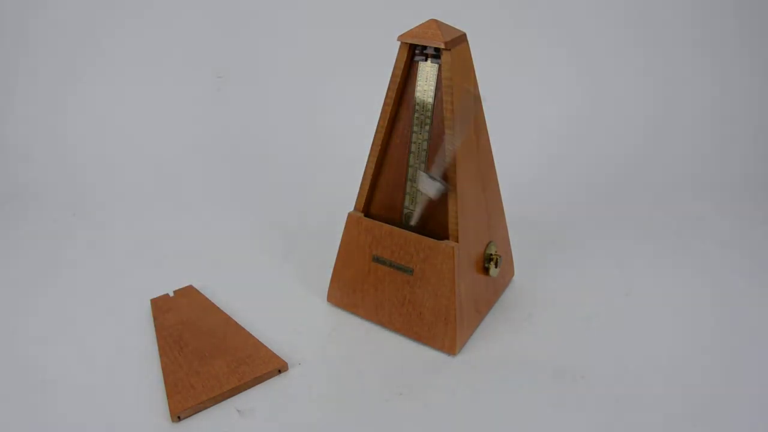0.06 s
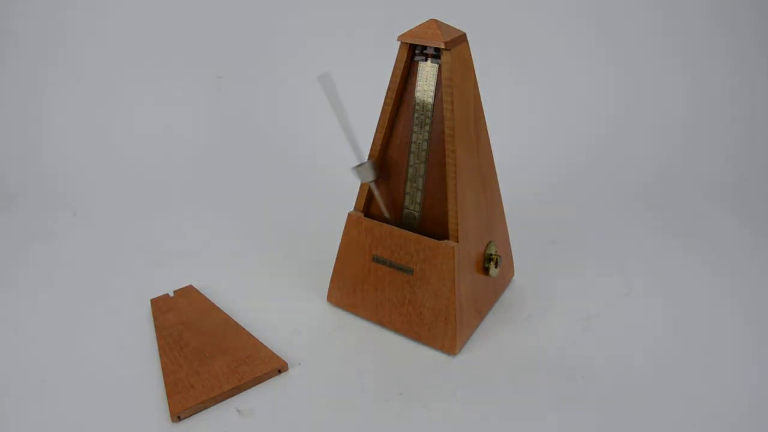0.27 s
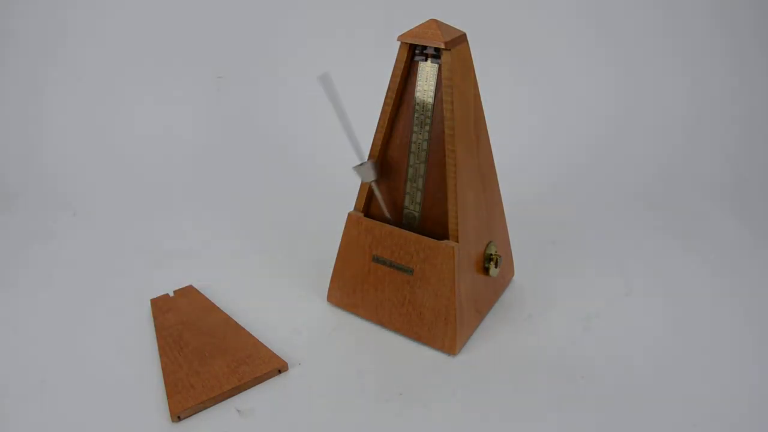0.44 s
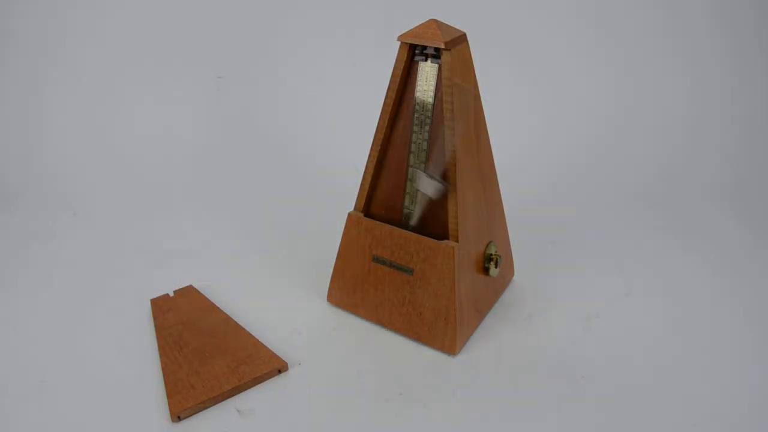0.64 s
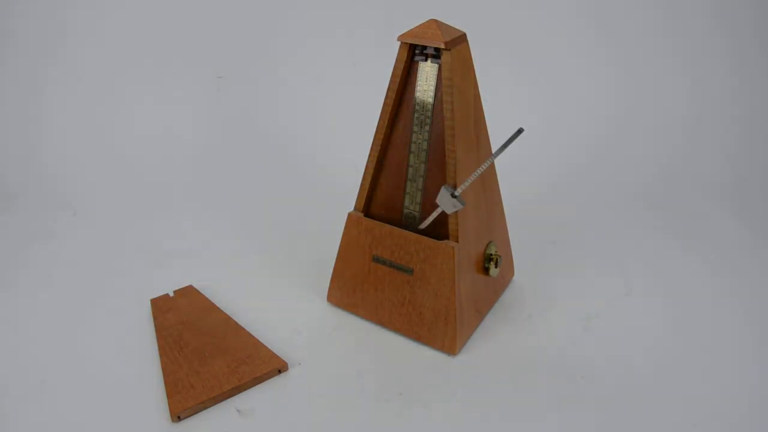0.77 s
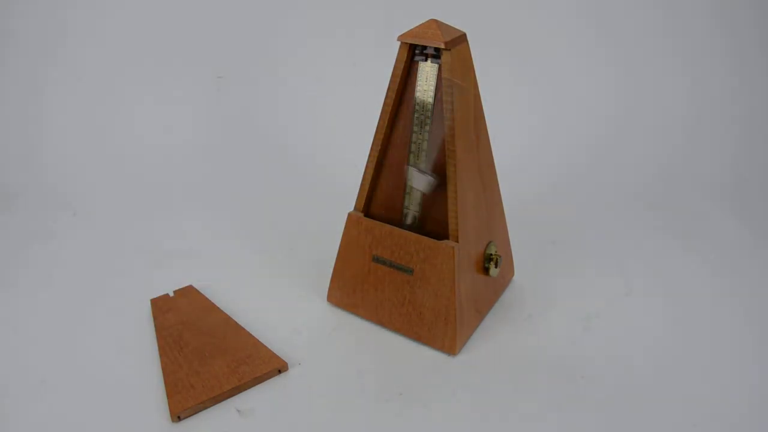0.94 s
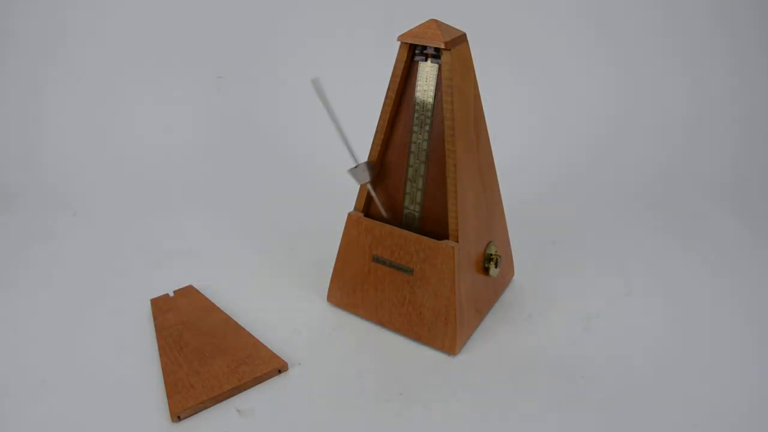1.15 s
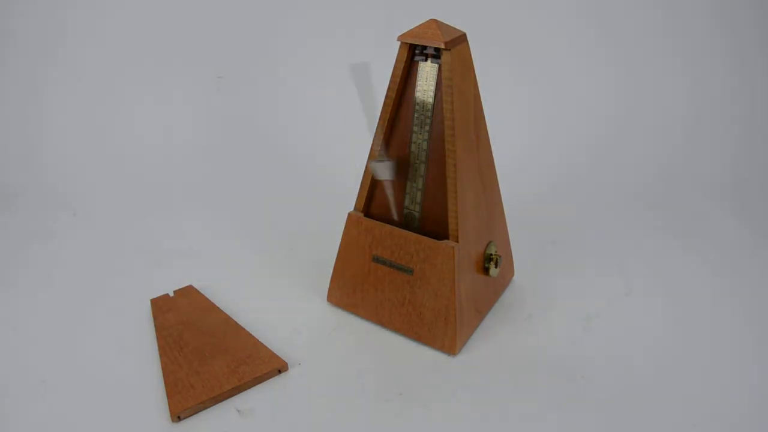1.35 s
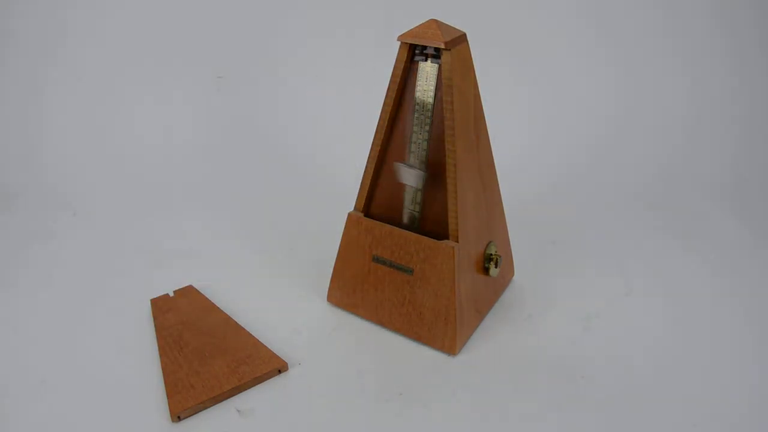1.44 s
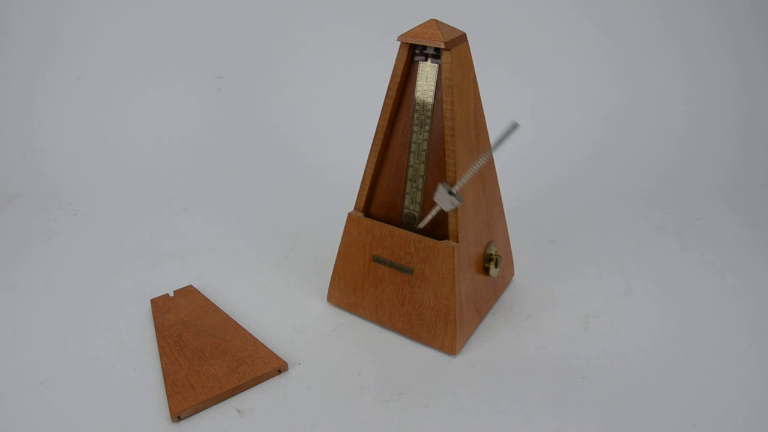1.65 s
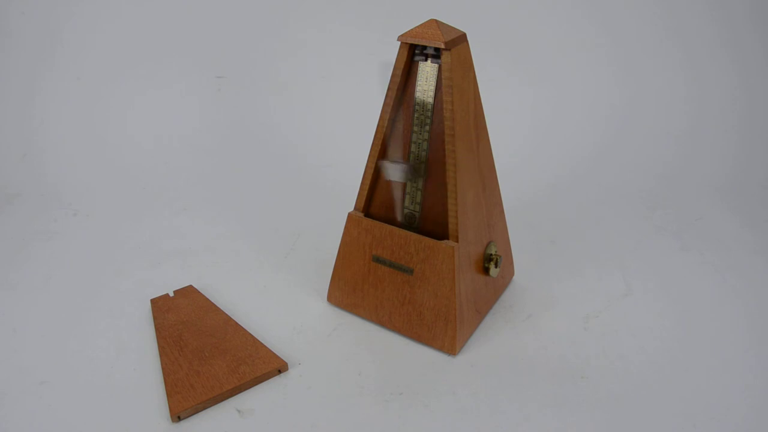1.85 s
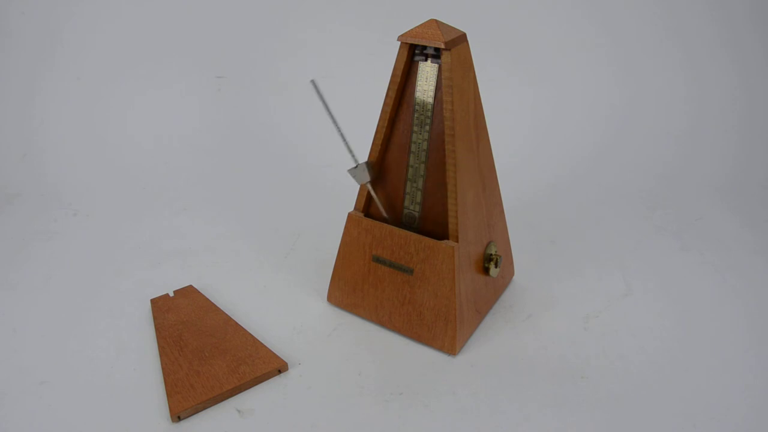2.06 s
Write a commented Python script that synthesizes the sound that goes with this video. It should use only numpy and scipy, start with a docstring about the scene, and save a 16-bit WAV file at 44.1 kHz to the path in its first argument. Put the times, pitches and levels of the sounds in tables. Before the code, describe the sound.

Sharp, hollow wooden metronome ticks, slightly uneven, five beats in two seconds over faint room hiss

```python
"""A low mains hum, soft room air and faint high whines are heard first, as steady sines and coloured noise.
Then a clockwork metronome ticks, slightly lopsided and close: before each beat the escapement squeaks
(a wavering sine) and slips with a tiny click (a decaying noise burst). The beat strikes, and the hollow wooden
case and steel works ring as damped modes with a noisy rattle. A near surface echoes the ticks, the room
answers with a diffuse noise tail, and the loudest peaks overload."""
import sys
import numpy as np
from scipy import signal
from scipy.fft import rfft, irfft
from scipy.io import wavfile
from scipy.ndimage import uniform_filter1d

SR = 44100
rng = np.random.default_rng(int(sys.argv[2]) if len(sys.argv) > 2 else 0)


def output_pcm(signal):
    """Save a mono or channel-first signal as 16-bit PCM at the path in sys.argv[1].

    Samples are clipped to [-1, 1] before scaling.
    """
    pcm = np.clip(np.atleast_2d(signal).T, -1, 1) * 32767
    wavfile.write(sys.argv[1], SR, np.round(pcm).astype(np.int16))


N = 92610  # length [samples]

# Levels are relative and apply ahead of record().
# colour of the room air: (frequency [Hz], spectral level [dB])
AIR_COLOUR = [(25, -22.5), (60, -13), (160, -8), (230, -2.5), (320, 2), (500, -6.5), (680, -1), (1200, -5),
              (2700, -9.5), (4800, -14), (5700, -24.5), (6600, -21.5), (8000, -29.5), (11000, -34.5),
              (14000, -41.5)]
AIR_RMS_DB = -54
# mains hum and two thin whines: (frequency [Hz], peak level [dB])
STEADY_TONES = [(119.6, -66), (8861, -76.5), (15682, -83)]

# squeaks of the escapement: (time of the loudest point [s], peak level [dB])
SQUEAK_SWELLS = [(.140, -58.5), (0.574, -71), (.980, -66), (1.415, -71), (1.820, -61)]
SQUEAK_HZ, SQUEAK_WAVER_RMS_HZ = 8866, 12
SQUEAK_WIDTH_S = 0.02  # from the peak to 1/e of it

# slips of the escapement before the beats: (time [s], strength [dB])
ESCAPEMENT_SLIPS = [(.1410, -47.5), (.5895, -45), (.9840, -42), (1.4340, -38), (1.8323, -46)]
# colour of the dull slip click: (frequency [Hz], spectral level [dB])
SLIP_COLOUR = [(200, 1), (700, 33), (1900, 18.5), (2600, 31.5), (3400, 29), (4600, 17.5), (5700, 5),
               (7000, 13), (11000, 2), (14000, -10)]
SLIP_T60_S = 0.029

# beats of the metronome: (time [s], strength [dB], side of the swing [0 or 1])
METRONOME_BEATS = [(0.2034, 1.5, 0), (0.6392, 0.5, 1), (1.0459, 1.48, 0), (1.482, 0.74, 1), (1.8892, 2, 0)]
# modes of the wooden case: (frequency [Hz], level [dB], t60 [s])
CASE_MODES = [(667.1, -4.5, .03), (716.3, -4, 0.022), (921, -25, .04), (1139, -22, 0.046),
              (1505, -35.5, 0.28), (1671, -17, 0.017), (1836, -17.5, .028), (2450, -17.5, .02),
              (2586, -12.5, 0.032), (3073, -11, .028), (3343, 0, 0.0099)]
# modes of the steel works: (frequency [Hz], level [dB], t60 [s])
WORKS_MODES = [(3800, -16.5, 0.027), (4022, -22.5, 0.057), (4530, -13, 0.027), (4660, -37, .03),
               (4993, -15.5, .032), (5230, -17, 0.02), (6470, -14.5, .016), (6655, -21, 0.034),
               (7190, -18, .018), (8690, -30, .018), (9550, -28, .014), (11110, -14.5, 0.0053),
               (14400, -7.5, 0.0014)]
# standard deviations of mode level: from blow to blow, and of the lean added on one side, taken off the other
BLOW_SPREAD_DB, SIDE_LEAN_DB = 1.72, 0.28
# colour of the rattle of dense small modes: (frequency [Hz], spectral level [dB])
RATTLE_COLOUR = [(100, -24), (450, -16.5), (800, 3.5), (1350, 12), (2050, 10), (2800, 18), (3300, 16.5),
                 (4200, 16.5), (5200, 18.5), (5650, -2), (6400, 12), (8200, 7.5), (9300, 9), (11300, 0.5),
                 (12100, -13), (14200, -9), (16000, -25)]
RATTLE_T60_S = 0.035
RATTLE_CHANGE = 0.47  # share of the power that differs from blow to blow
CASE_LOW_CUT_HZ = 523  # so small a case radiates no bass
ECHO_S, ECHO_DB = 0.0068, -24.5  # one reflection from a near surface

# the room's answer to the crack a beat throws out on all sides: (frequency [Hz], spectral level [dB])
CRACK_ANSWER = [(100, -27.5), (430, -8.5), (540, 7), (660, 17.5), (760, 19.5), (850, 7.5), (1150, 8),
                (1330, 5.5), (1800, 12.5), (2150, 11.5), (2550, 15.5), (2900, 15), (3250, 15.5), (3600, 6),
                (4600, 12.5), (5120, 10), (5330, 1), (5700, -1.5), (6400, 6.5), (8200, -1), (9600, -2.5),
                (11200, -11.5), (12100, -18), (14200, -28.5), (15000, -52)]
# the room's answer to the ringing: (frequency [Hz], spectral level [dB])
RINGING_ANSWER = [(80, -24.5), (300, 3.5), (600, -9.5), (750, -12.5), (1200, -7.5), (2050, -16.5),
                  (2600, -16.5), (3300, -18.5), (4200, -16.5), (5000, -17), (7000, -17.5), (9500, -18),
                  (14000, -26.5), (15500, -39.5)]
# decay of the room: (band centre [Hz], t60 [s])
ROOM_DECAY = [(300, 0.33), (700, 0.38), (2000, 0.34), (5000, 0.42), (9000, 0.34), (14000, 0.29)]
ROOM_DELAY_S, ROOM_BUILD_S = 0.0038, 0.0054

CLIP_LEVEL, CLIP_HARDNESS = 1, 13
CUTOFF_HZ = 16500


def from_db(db):
    """Logarithmic level: decibels become an amplitude gain."""
    return 10 ** (np.asarray(db) / 20)


def at_hz(points, hz):
    """Logarithmic frequency scale: read a table by linear interpolation along it."""
    table_hz, value = np.transpose(points)
    return np.interp(np.log(np.maximum(hz, 1)), np.log(table_hz), value)


def coloured(colour, size):
    """Spectral shaping: white noise of unit spread is weighted frequency by frequency."""
    white = rng.standard_normal(size)
    gain = from_db(at_hz(colour, np.fft.rfftfreq(size, 1 / SR)))
    return irfft(rfft(white) * gain, size)


def dying(t, t60):
    """Exponential damping: the level falls 60 dB in t60; the envelope has unit energy."""
    fall = from_db(-60 * t / t60)
    return fall / np.sqrt(np.sum(fall ** 2))


def add(out, s, sound):
    """Superposition: mix a sound in at a time in seconds."""
    part = out[max(int(s * SR), 0):][:len(sound)]
    part += sound[:len(part)]


def background():
    """Stationary sound: coloured noise for room air, constant sines for mains hum and whines."""
    t = np.arange(N) / SR
    air = coloured(AIR_COLOUR, N)
    out = from_db(AIR_RMS_DB) * air / air.std()
    for hz, db in STEADY_TONES:
        out += from_db(db) * np.sin(2 * np.pi * (hz * t + rng.random()))
    return out


def squeak():
    """Sliding friction of steel on steel: a thin, frequency-modulated tone swells and fades before each beat."""
    t = np.arange(N) / SR
    swell = sum(from_db(db) * np.exp(-((t - s) / SQUEAK_WIDTH_S) ** 2) for s, db in SQUEAK_SWELLS)
    waver = uniform_filter1d(rng.standard_normal(N), size=400)  # noise smoothed over 9 ms
    hz = SQUEAK_HZ + SQUEAK_WAVER_RMS_HZ * waver / waver.std()
    return swell * np.sin(2 * np.pi * np.cumsum(hz) / SR)


def slips():
    """Impact noise: the slipping escapement gives a soft, decaying noise burst before each beat."""
    t = np.arange(SR // 20) / SR
    out = np.zeros(N)
    for s, strength_db in ESCAPEMENT_SLIPS:
        click = coloured(SLIP_COLOUR, len(t)) * dying(t, SLIP_T60_S)
        add(out, s, from_db(strength_db) * click)
    return out


def blows():
    """Modal superposition: each beat excites the same damped modes, a little differently on each side."""
    t = np.arange(SR // 6) / SR
    hz, db, t60 = np.transpose(CASE_MODES + WORKS_MODES)
    decay = np.exp(-np.log(1000) * t / t60[:, None])
    rings = np.sin(2 * np.pi * hz[:, None] * t) * decay
    signs = -(-1) ** np.arange(len(hz))  # neighbouring modes start in opposite phase
    lean_db = rng.normal(0, SIDE_LEAN_DB, len(hz))
    shared_rattle = coloured(RATTLE_COLOUR, len(t))
    out = np.zeros(N)
    for s, strength_db, side in METRONOME_BEATS:
        side_db = lean_db if side > 0.5 else -lean_db
        blow_db = rng.normal(0, BLOW_SPREAD_DB, len(hz))
        gains = signs * from_db(db + side_db + blow_db)
        fresh_rattle = coloured(RATTLE_COLOUR, len(t))
        rattle = np.sqrt(1 - RATTLE_CHANGE) * shared_rattle + np.sqrt(RATTLE_CHANGE) * fresh_rattle
        ringing = gains @ rings
        add(out, s, from_db(strength_db) * (ringing + rattle * dying(t, RATTLE_T60_S)))
    return out


def cracks():
    """Impulse excitation: one single-sample click for each beat, to drive the room."""
    out = np.zeros(N)
    for s, strength_db, _ in METRONOME_BEATS:
        add(out, s, from_db([strength_db]))
    return out


def room(x, colour):
    """Diffuse reverberation: convolve with a noise tail that builds up quickly and decays band by band."""
    t = np.arange(SR // 2) / SR
    hz = np.fft.rfftfreq(len(t), 1 / SR)
    diffuse = rfft(coloured(colour, len(t)))
    centres = [centre for centre, _ in ROOM_DECAY]
    tail = np.zeros(len(t))
    # each row of the identity picks one band, which cross-fades into its neighbours
    for (_, t60), pick in zip(ROOM_DECAY, np.eye(len(centres))):
        weight = at_hz(list(zip(centres, pick)), hz)
        tail += irfft(diffuse * weight, len(t)) * dying(t, t60)
    onset = np.clip((t - ROOM_DELAY_S) / ROOM_BUILD_S, 0, 1)
    return signal.fftconvolve(x, tail * onset)[:N]


def scene():
    """Superposition of background, squeak, ticks with their near echo, and the room's answers."""
    low_cut = signal.butter(4, CASE_LOW_CUT_HZ, "high", fs=SR, output="sos")
    ticks = signal.sosfilt(low_cut, slips() + blows())
    answers = room(ticks, RINGING_ANSWER) + room(cracks(), CRACK_ANSWER)
    out = background() + squeak() + ticks + answers
    add(out, ECHO_S, from_db(ECHO_DB) * ticks)
    return out[None]


def record(dry):
    """Saturation and band limiting: the loudest peaks are flattened, then the top is cut."""
    # the 0.5 lifts quiet sound by about half a decibel
    bend = 0.5 + np.abs(dry / CLIP_LEVEL) ** CLIP_HARDNESS
    clipped = dry / bend ** (1 / CLIP_HARDNESS)
    top_cut = signal.ellip(10, 0.1, 80, CUTOFF_HZ, fs=SR, output="sos")
    return signal.sosfilt(top_cut, clipped)


dry = scene()
out = record(dry)
output_pcm(out)
```